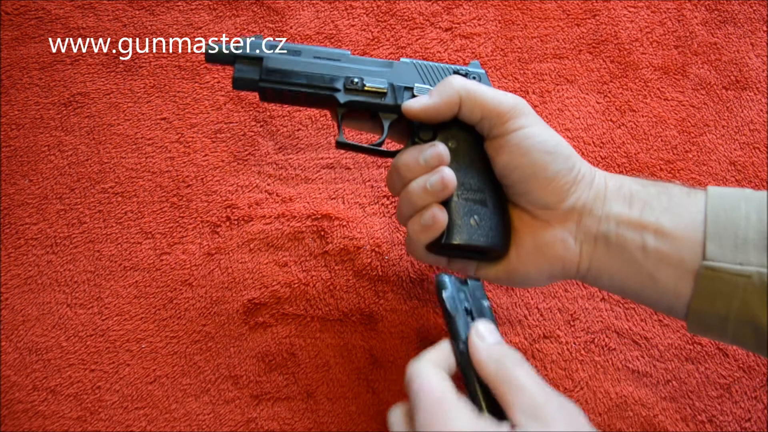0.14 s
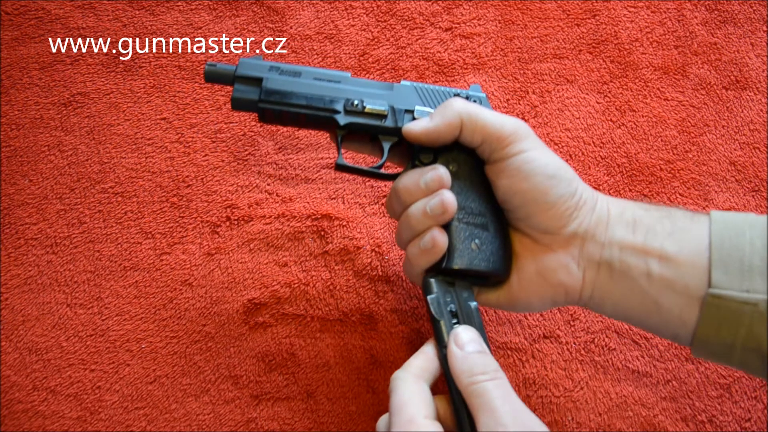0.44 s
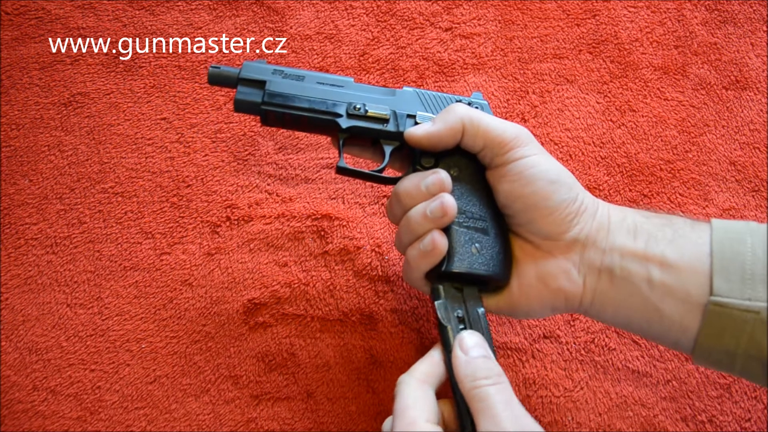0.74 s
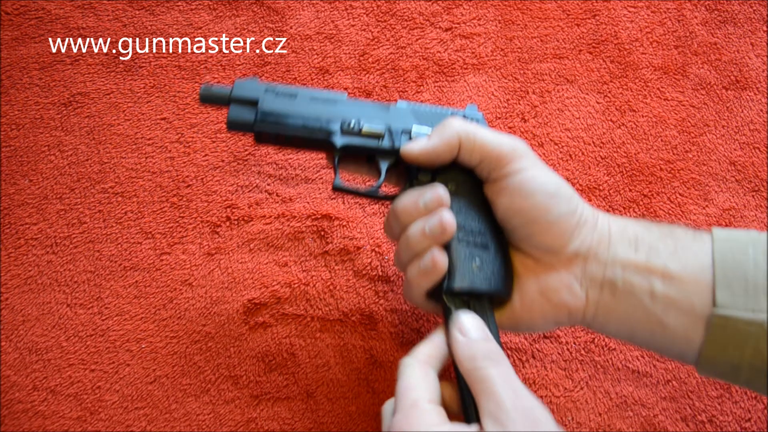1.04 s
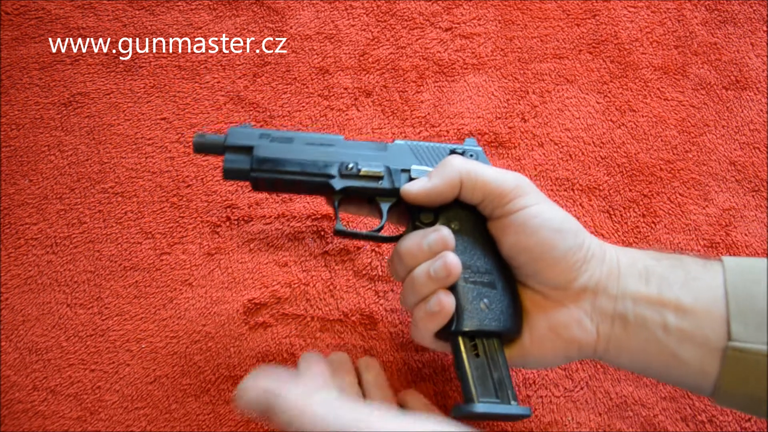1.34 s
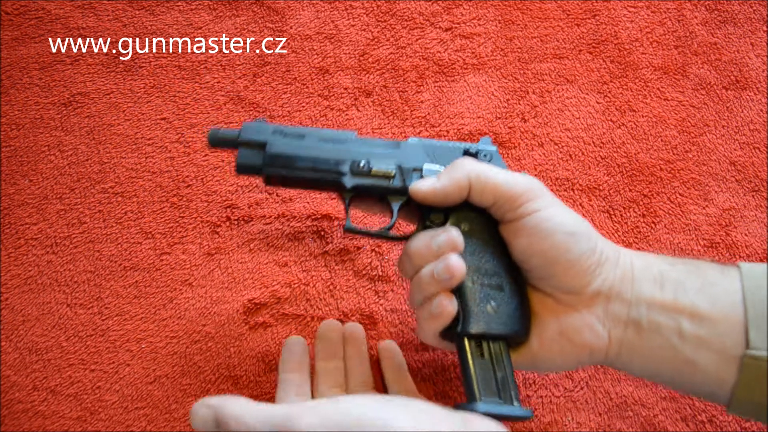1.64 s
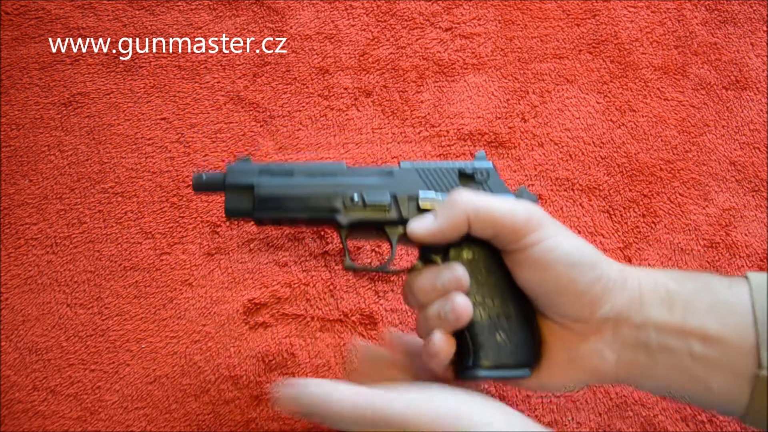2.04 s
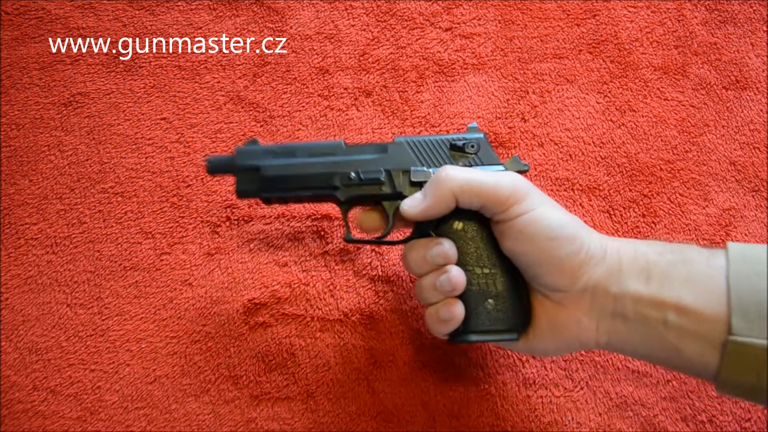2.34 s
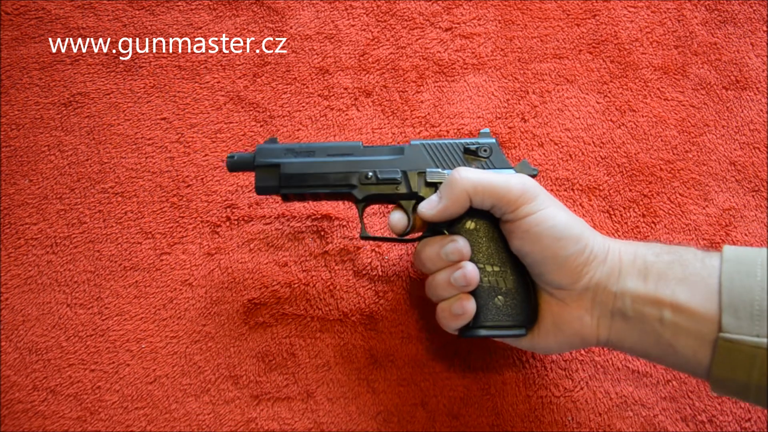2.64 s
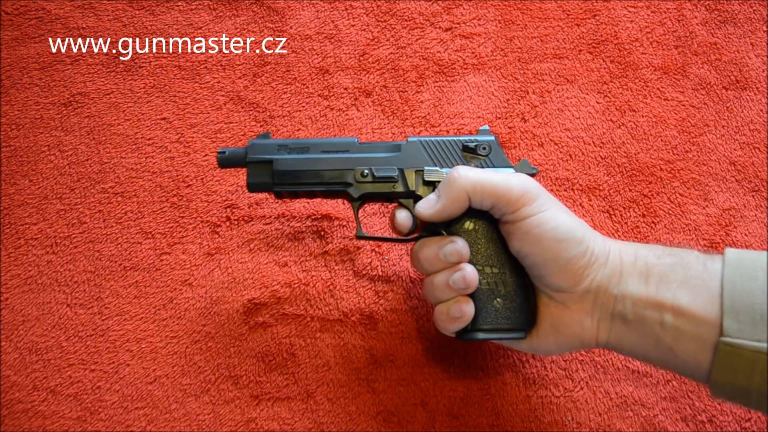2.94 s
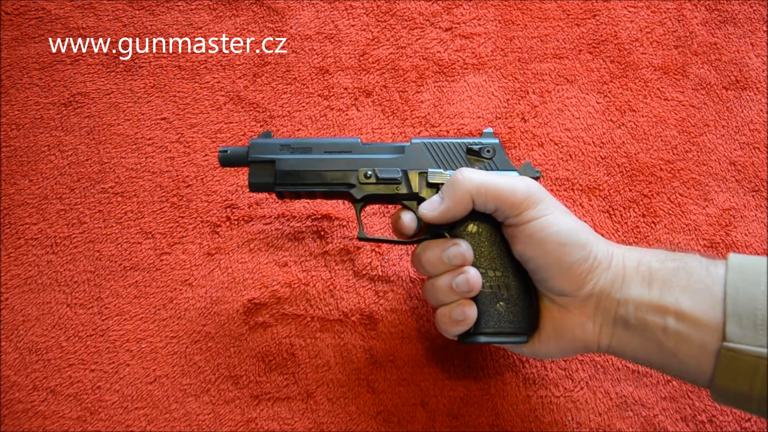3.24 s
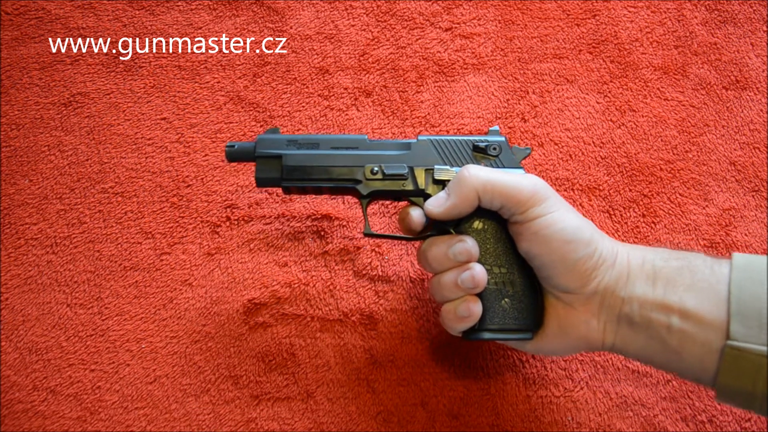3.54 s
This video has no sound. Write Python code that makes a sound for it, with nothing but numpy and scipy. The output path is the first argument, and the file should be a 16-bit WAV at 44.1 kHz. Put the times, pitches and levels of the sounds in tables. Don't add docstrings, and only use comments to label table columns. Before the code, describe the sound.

Close handling of a small steel handgun indoors: light ticks, magazine rubbing in to a stop, sharp seating blow, a cocking click, and finally a loud clipped hammer crack with a short room tail over soft camera whirr.

```python
import sys
import numpy as np
from scipy import signal
from scipy.fft import rfft, irfft
from scipy.io import wavfile
from scipy.ndimage import uniform_filter1d

SR = 44100
rng = np.random.default_rng(int(sys.argv[2]) if len(sys.argv) > 2 else 0)


def elevation(decibels):
    levels = np.asarray(decibels, float)
    return 10 ** (levels / 20)


def put_to_file(sound):
    columns = np.atleast_2d(sound).T
    safe = np.clip(columns, -1, 1)
    whole_steps = np.round(safe * 32767)
    wavfile.write(sys.argv[1], SR, whole_steps.astype(np.int16))


N = 163170

# pitch_hz, level_db (per Hz)
FAN_COLOUR = [(30, -19.5), (100, -2.5), (300, 1), (700, -2.5), (1400, -6.5), (3000, -19.5), (7000, -36),
              (15000, -36.5)]
# pitch_hz, width_hz, level_db
WHIRR_BANDS = [(1006, 140, -4), (2090, 250, -3.5), (2660, 130, -1), (3000, 330, -1.5), (4430, 1200, -11.5),
               (5160, 250, -6.5), (6140, 100, -3), (7520, 140, -7.5)]
# start_s, end_s
WHIRR_PAUSES = [(.19, 0.2), (0.278, 0.33), (0.358, 0.357), (0.634, 0.68), (.712, 0.725), (2.398, 2.43),
                (3.049, 3.07)]
# pitch_hz, level_db
WHISTLE_TONES = [(15692, -75)]
# pitch_hz, t60_s
ROOM_DECAY = [(350, 0.8), (700, 0.56), (1400, 0.62), (2800, 0.62), (5000, 0.62), (8000, 0.45),
              (11500, 0.42), (15500, 0.15)]
# start_s, length_s, pitch_hz, width_hz, level_db
SOFT_THUDS = [
    (1.09, 0.104, 334, 110, -51),
    (1.084, 0.114, 172, 19, -54),
    (1.546, 0.1, 185, 32, -62.5),
    (1.87, 0.6, 324, 30, -61.5),
]

# start_s, level_db
SHIFT_CURVE = [(.47, -82), (.495, -60), (.52, -61), (.56, -68.5), (.62, -74), (.68, -90), (1.45, -89),
               (1.475, -67.5), (1.5, -55), (1.52, -65.5), (1.56, -68.5), (1.61, -65.5), (1.65, -49),
               (1.66, -89.5)]
SLIDE_CURVE = [(.94, -100), (.96, -55), (1.0, -59), (1.045, -57), (1.075, -46), (1.11, -50), (1.165, -53.5),
               (1.18, -84.5)]
LIPS_CURVE = [(.735, -88), (.748, -62), (.765, -91), (1.0, -68), (1.05, -61), (1.058, -47), (1.07, -57),
              (1.074, -39.5), (1.088, -46), (1.12, -55), (1.16, -58.5), (1.18, -92), (1.48, -82),
              (1.494, -61), (1.504, -63.5), (1.52, -79.5)]
# pitch_hz, width_hz, level_db
SHIFT_BANDS = [(1160, 140, 0.2), (1570, 320, 1.5), (3550, 400, 5.0), (5170, 2500, -17)]
SLIDE_BANDS = [(450, 300, 11.5), (780, 250, 7.5), (1100, 200, 9.5), (2340, 250, 18.5), (4680, 900, -4.5)]
LIPS_BANDS = [(4840, 900, 0.0), (6420, 460, -2), (7670, 500, 3.5), (8450, 740, 3), (10590, 1500, -10)]
# pitch_hz, level_db
RUB_COLOUR = [(250, -15), (600, 6.5), (9500, -2.5), (13000, -22.0)]

# pitch_hz, level_db, t60_ms
MAGAZINE_MODES = [(600, -1.5, 10), (830, -0.5, 17.5), (1145, -2, 27), (1428, -5.5, 17), (2354, 4, 12),
                  (3620, 2, 8), (5150, 0, 5), (6180, -8.5, 5.6), (8200, -8.5, 2.6)]
WELL_MODES = [(720, -2.5, 16), (1093, 1, 96), (1541, -4, 39), (1970, 1, 8.4), (2420, 0.5, 23),
              (3567, 0, 7.1), (4380, -12, 10), (5500, -2.5, 6), (6430, -6.5, 7.4), (7300, -10, 9.2),
              (8200, -10.5, 8), (10200, -15, 3)]
LATCH_MODES = [(726, -3, 15), (1359, 5, 6.4), (1827, 1, 4), (2553, 2.5, 3.3), (3704, 2.5, 3.3),
               (4900, 4.5, 6.6), (6350, -3.5, 10), (7560, -1, 4.4), (8575, 1, 2.7), (11920, -12.5, 1.9),
               (12960, -14.5, 2.6)]
SEAR_MODES = [(1065, -6.5, 6), (1540, -5, 10), (2109, 4, 30), (2770, -3.5, 15), (3560, 1.5, 8),
              (4870, 0, 7.1), (6200, 2.5, 4), (7000, -5.5, 4), (8900, 6, 4.6), (12340, -21.5, 4)]
HAMMER_MODES = [(893, -2.5, 14), (1517, 3, 11), (2020, 3, 16), (2950, 4, 5), (3590, 6, 5.6), (4560, 6.5, 6),
                (5200, 4, 15), (6320, 3.5, 6.5), (7247, 0, 6), (8000, 8.5, 3.7), (8780, 3, 1.8),
                (10960, 1.5, 7), (12680, -3.5, 8), (14200, -13, 3)]
# pitch_hz, level_db
MAGAZINE_RADIATION = [(250, -18.5), (800, -8), (1020, -1), (1800, -8), (2480, -3), (4000, -11.5),
                      (8000, -17.5), (15000, -37.5)]
LATCH_RADIATION = [(250, -24.5), (800, -5), (1850, -9), (2400, 2), (3100, -7.5), (4700, -8), (7800, -8.5),
                   (15000, -36.5)]
HAMMER_RADIATION = [(250, -35), (800, -8.5), (1250, -8.5), (1600, -1), (5100, -2), (8900, -4),
                    (12500, -15.5), (15500, -25)]

# start_s, peak_db, low_modes_db, high_modes_db, contact_ms
FINGER_TICKS = [(.426, -47, -10, 3, 1), (.521, -45, -6, -6, 1.5), (1.4718, -41, 0, -18, .5),
                (1.503, -42, -3, -12, .6), (2.205, -52, 0, -6, 1), (2.681, -55, -15, 10, .6),
                (3.022, -47, -12, 3, 1), (3.122, -48, -12, 3, 1), (3.138, -41, -12, 0, .8),
                (3.685, -46, -8, 0, 2)]
INSERT_HITS = [(.729, -42.5, 14, -3, 0.59), (.7675, -33.5, 21, -2, 0.6), (.8628, -24, 2, -4, .8),
               (.9565, -30.5, 8, -8.5, 1), (.972, -30, 4, -11, 0.49), (1.0045, -44.5, 3, -12, 1),
               (1.009, -42.5, 12, -14, 1.2), (1.014, -34.5, 3.5, -10.5, 0.48), (1.031, -45, 6.5, -4, 1.2),
               (1.048, -32, 2, -18, 0.86), (1.0665, -27, -0.5, -8.5, 0.83), (1.0715, -31, 9.5, -3.5, 1.6),
               (1.122, -38, -0.5, -9.5, 1.1), (1.128, -41.5, 6.5, -13, 1.7)]
# start_s, peak_db, low_modes_db, high_modes_db, contact_ms
STOP_HITS = [
    (1.1625, -22, -18.5, 7.5, 0.52),
    (1.1707, -14, 5.5, -0.5, 1.2),
    (1.173, -21.5, 0, 8.5, 0.51),
    (1.1762, -16, 1, -8, 0.95),
    (1.1897, -22.5, 3, -1, 1.3),
]
# start_s, peak_db, low_modes_db, high_modes_db, contact_ms
SEAT_HITS = [
    (1.651, -18, 10, -29.5, .8),
    (1.6538, -11, 4.5, -3, .5),
    (1.6715, -17, 1.5, -1.5, 1.74),
    (1.6838, -10.5, -0.5, -1, 1.4),
    (1.690, -9.5, -4, -4, 2.5),
    (1.6953, -4.5, -4.5, -1, 2.4),
    (1.7017, 1, -2, 2, 0.73),
    (1.7045, -10, -1.5, -1.5, 1.33),
]
# start_s, peak_db, low_modes_db, high_modes_db, contact_ms
COCK_HITS = [
    (2.4985, -17.5, 2.5, -3, 0.46),
]
# start_s, peak_db, low_modes_db, high_modes_db, contact_ms
HAMMER_HITS = [
    (3.2222, -17, 1.5, -7, 1.6),
    (3.2262, 2.5, -3, 1.5, 2.6),
    (3.229, 0, 5, 0.5, 1.82),
]
# start_s, peak_db, low_modes_db, high_modes_db, contact_ms
FALL_ECHOES = [(3.2332, -7, 0, -3, 1.5), (3.2375, -9, 0, -8, 2), (3.2405, -7, -3, -5, 1),
               (3.2453, -2, -10, -1, .7), (3.2555, -9, -2, -14, .8), (3.2605, -11, -6, -10, .5)]
# start_s, peak_db
LOW_JOLTS = [
    (1.701, -34.5),
    (3.229, -19),
]

LOW_MODES_HZ, HIGH_MODES_HZ = 1900, 5700
SLEEVE_HIGH_HZ = 3000
FLICKER_DB = 1.1


def shaped(points, x):
    curve = np.array(points)
    hz = np.fft.rfftfreq(len(x), 1 / SR) + 1
    level_db = np.interp(np.log(hz), np.log(curve[:, 0]), curve[:, 1])
    return irfft(rfft(x) * elevation(level_db), len(x))


def band(x, hz, width_hz):
    return signal.lfilter(*signal.iirpeak(hz, hz / width_hz, fs=SR), x)


def lowpass(x, hz):
    return signal.sosfilt(signal.butter(2, hz, fs=SR, output="sos"), x)


def unit(x):
    return x / np.sqrt(np.mean(x ** 2))


def walk(rate_hz):
    k = int(SR / rate_hz)
    steps = np.repeat(rng.standard_normal(N // k + 1), k)
    return unit(uniform_filter1d(uniform_filter1d(steps, k), k)[:N])


def fan():
    air = unit(shaped(FAN_COLOUR, rng.standard_normal(N)))
    return air * elevation(-64.5 + FLICKER_DB * walk(0.91) / 2)


def whirr():
    t = np.arange(N) / SR
    off = uniform_filter1d(sum((t > start) * (t < end) * 1. for start, end in WHIRR_PAUSES), size=500)
    stutter_db = 3 * walk(70)
    drive = np.zeros(N)
    for hz, width, db in WHIRR_BANDS:
        level_db = db + 1.1 * walk(7.9) + stutter_db * min(hz / 6000, 1)
        drive += elevation(level_db) * band(rng.standard_normal(N), hz, width)
    pause_db = -9 * off
    return unit(drive) * elevation(-64.5 + pause_db + FLICKER_DB * walk(18))


def whistle():
    t = np.arange(N) / SR
    return sum(elevation(db) * np.sqrt(2) * np.sin(2 * np.pi * hz * t) for hz, db in WHISTLE_TONES)


def room(x):
    build_s, early_db, early_s, grain_db = 0.0021, 4.5, 0.0075, 2.5
    t = np.arange(SR) / SR
    decay = np.array(ROOM_DECAY)
    centres = np.log(np.geomspace(decay[0, 0], decay[-1, 0], num=16))
    t60 = np.interp(centres, np.log(decay[:, 0]), decay[:, 1])
    f = np.log(np.fft.rfftfreq(SR, 1 / SR) + 1)
    noise = rfft(rng.standard_normal(SR))
    tail = np.zeros(SR)
    for one_band, decay_s in zip(np.eye(len(centres)), t60):
        tail += irfft(noise * np.interp(f, centres, one_band), SR) * 1000. ** (-t / decay_s)
    build = 1 - np.exp(-(t / build_s) ** 2)
    early = early_db * np.exp(-t / early_s)
    grain = grain_db * walk(300)[:SR] * np.exp(-t / (2 * early_s))
    tail *= build * elevation(early + grain)
    return signal.fftconvolve(x, tail / np.sqrt(np.sum(tail ** 2)))[:N]


def thuds():
    t = np.arange(N) / SR
    out = np.zeros(N)
    for start, length, hz, width, db in SOFT_THUDS:
        swell = np.sin(np.pi * np.clip((t - start) / length, 0, 1))
        out += elevation(db) * unit(band(rng.standard_normal(N), hz, width)) * swell
    return out


def rubbing(curve, bands, rough_db):
    start_s, level_db = np.array(curve).T
    slips = rng.standard_normal(N) * elevation(rough_db * walk(400) + FLICKER_DB * walk(73))
    body = sum(elevation(db) * band(slips, hz, width) for hz, width, db in bands)
    return unit(body) * elevation(np.interp(np.arange(N) / SR, start_s, level_db))


def handling():
    rub = rubbing(SLIDE_CURVE, SLIDE_BANDS, rough_db=6.0)
    rub += rubbing(LIPS_CURVE, LIPS_BANDS, rough_db=5.0)
    rub += rubbing(SHIFT_CURVE, SHIFT_BANDS, rough_db=3.5)
    rub = shaped(RUB_COLOUR, rub)
    return rub + elevation(-4.5) * room(rub)


def jolts():
    t = np.arange(N) / SR
    return sum(elevation(db) * np.exp(-((t - start) / 0.00026) ** 2) for start, db in LOW_JOLTS)


def strike(contact, modes):
    scatter_db, detune = 1.5, .03
    _, peak_db, low_db, high_db, contact_ms, high_hz = contact
    t = np.arange(2048) / SR
    hz, db, t60_ms = np.array(modes, float).T[:, :, None]
    luck = rng.standard_normal((2, len(modes), 1))
    pitch = hz * (1 + detune * luck[1])
    u = t / (contact_ms / 1000)
    force = rng.standard_normal(2048) * u * np.exp(-2 * u)
    gain = elevation(db + scatter_db * luck[0] + low_db * (hz < LOW_MODES_HZ) + high_db * (hz > high_hz))
    push = np.abs(np.exp(2j * np.pi * pitch * t) @ force)[:, None]
    gain /= push + np.sqrt(np.sum(force ** 2)) / 10
    decay = 1000. ** (-t * 1000 / t60_ms)
    ring = gain / np.sqrt(t60_ms) * np.minimum(t * hz, 1) * np.sin(2 * np.pi * pitch * t) * decay
    polarity = (-1) ** np.arange(len(modes))[:, None]
    hit = np.convolve(force, (ring * polarity).sum(axis=0))
    return hit * elevation(peak_db) / np.abs(hit).max(), np.sign(force[1])


def clicks(contacts, modes, radiation, wet_db, high_hz=HIGH_MODES_HZ):
    near, send = np.zeros(N + 4096), np.zeros((3, N))
    for contact in contacts:
        start, _, low_db, high_db, _ = contact
        hit, sign = strike((*contact, high_hz), modes)
        at = int(start * SR)
        near[at:at + len(hit)] += hit
        tilt = elevation(np.array([low_db, 0, high_db]) / 2)
        send[:, at] += sign * np.sqrt(np.sum(hit ** 2)) * tilt / tilt.max()
    low = lowpass(send[:2], LOW_MODES_HZ)
    below = lowpass(send[1:], high_hz)
    pulse = low[0] + (below[0] - low[1]) + (send[2] - below[1])
    bass_cut = signal.butter(3, 520, "high", fs=SR, output="sos")
    return signal.sosfilt(bass_cut, near[:N]) + room(elevation(wet_db + 6.5) * shaped(radiation, pulse))


def pistol():
    hits = clicks(FINGER_TICKS, SEAR_MODES, HAMMER_RADIATION, wet_db=-8)
    hits += clicks(INSERT_HITS, MAGAZINE_MODES, MAGAZINE_RADIATION, wet_db=1, high_hz=SLEEVE_HIGH_HZ)
    hits += clicks(STOP_HITS, WELL_MODES, MAGAZINE_RADIATION, wet_db=-1.5, high_hz=SLEEVE_HIGH_HZ)
    hits += clicks(SEAT_HITS, LATCH_MODES, LATCH_RADIATION, wet_db=-2.5)
    hits += clicks(COCK_HITS, SEAR_MODES, HAMMER_RADIATION, wet_db=-7.5)
    hits += clicks(HAMMER_HITS, HAMMER_MODES, HAMMER_RADIATION, wet_db=-3.5)
    hits += clicks(FALL_ECHOES, HAMMER_MODES, HAMMER_RADIATION, wet_db=-30)
    return hits + jolts()


def scene():
    background = fan() + whirr() + whistle()
    return (background + thuds() + handling() + pistol())[None]


def band_limit(x):
    return signal.sosfilt(signal.butter(12, 16160, fs=SR, output="sos"), x)


def record(dry):
    notch_hz, notch_width_hz, notch_depth = 5750, 380, .8
    x = dry - notch_depth * band(dry, notch_hz, notch_width_hz)
    return band_limit(np.clip(x, -1.0, 1.0))


dry = scene()
out = record(dry)
put_to_file(out)
```